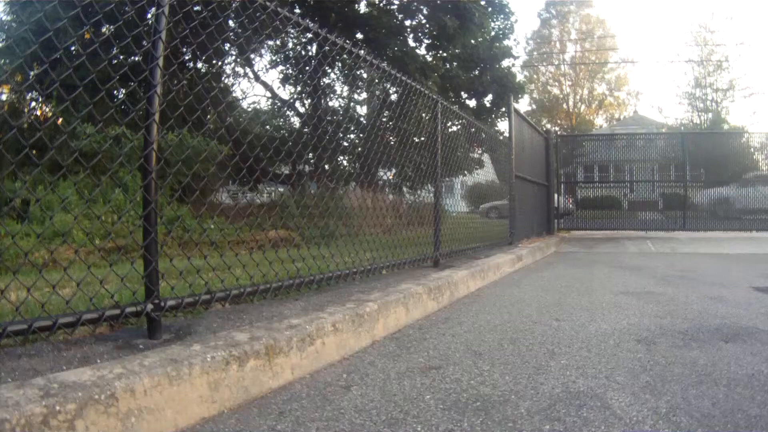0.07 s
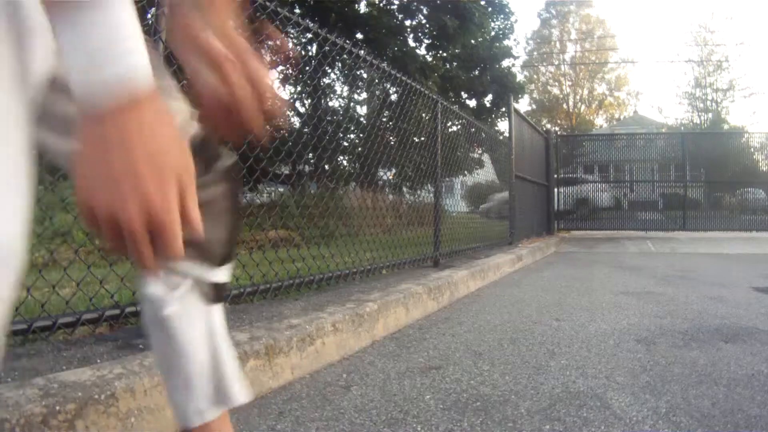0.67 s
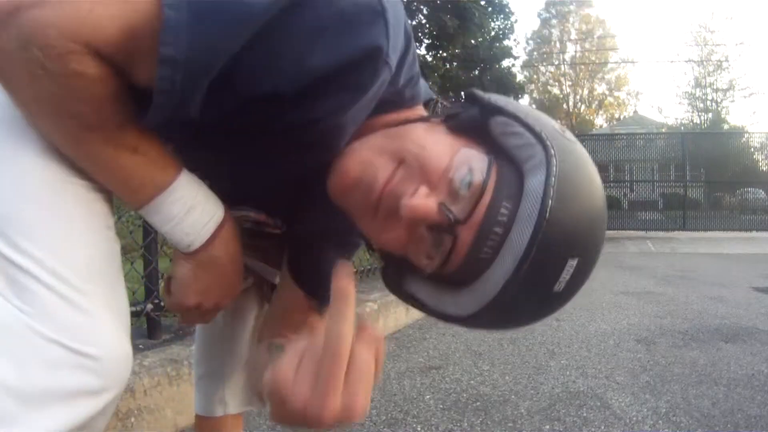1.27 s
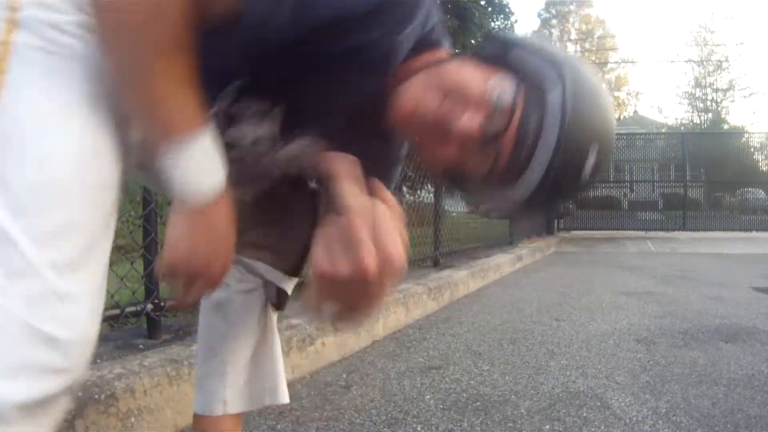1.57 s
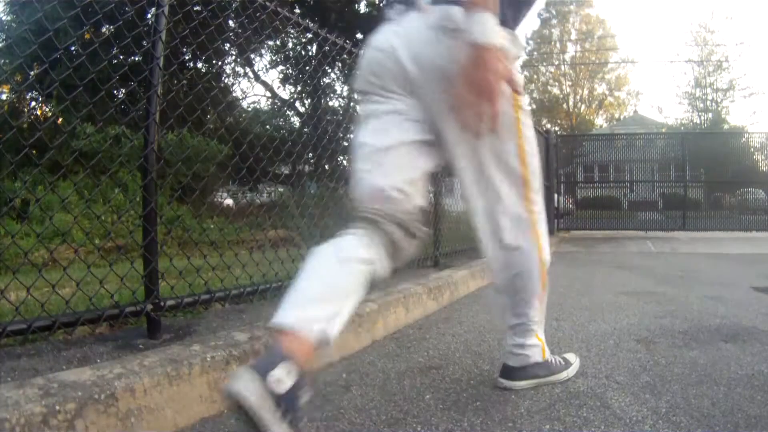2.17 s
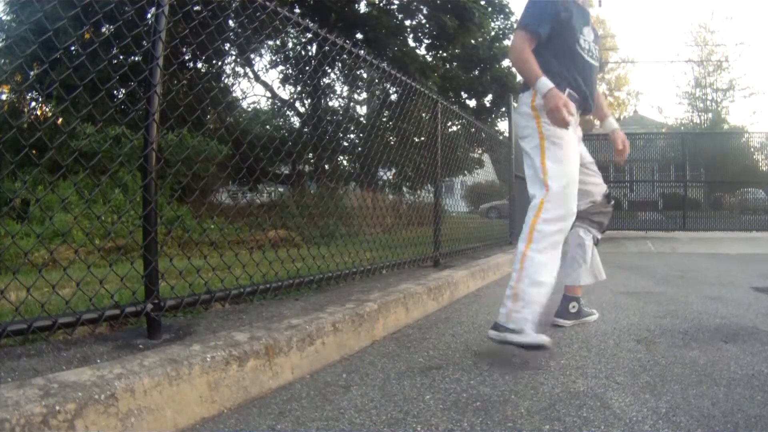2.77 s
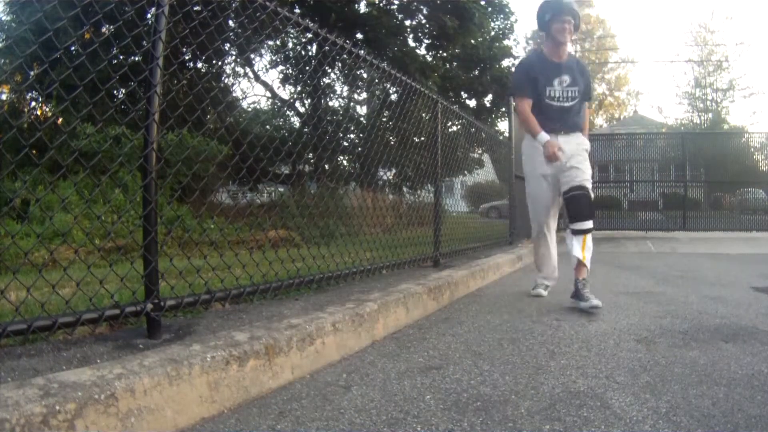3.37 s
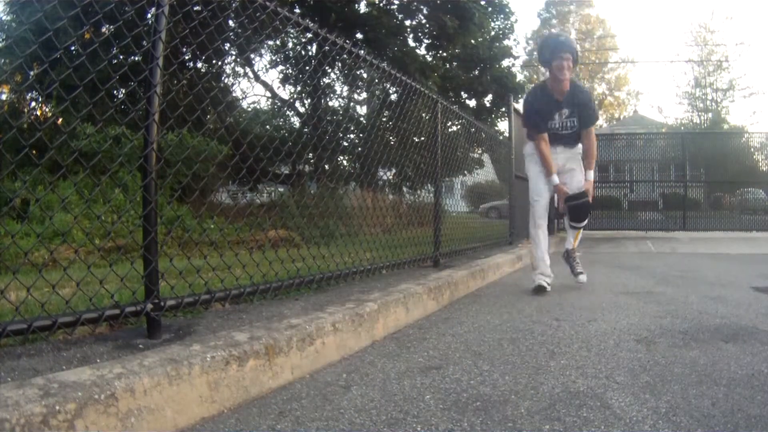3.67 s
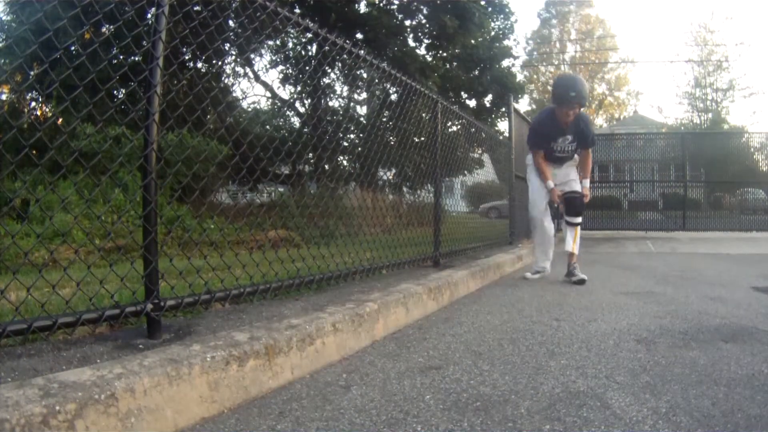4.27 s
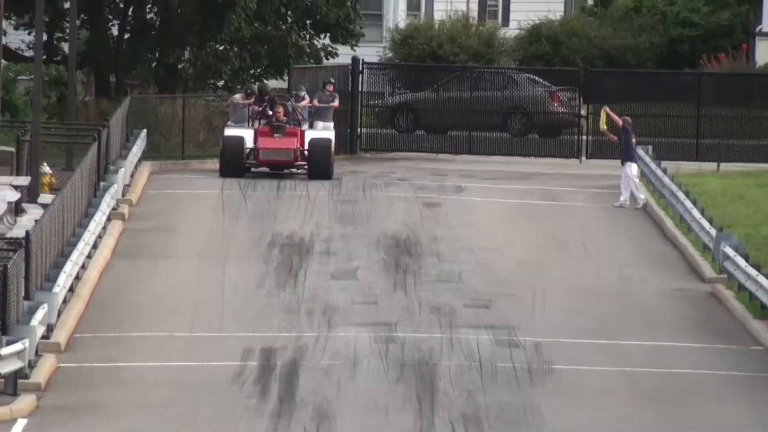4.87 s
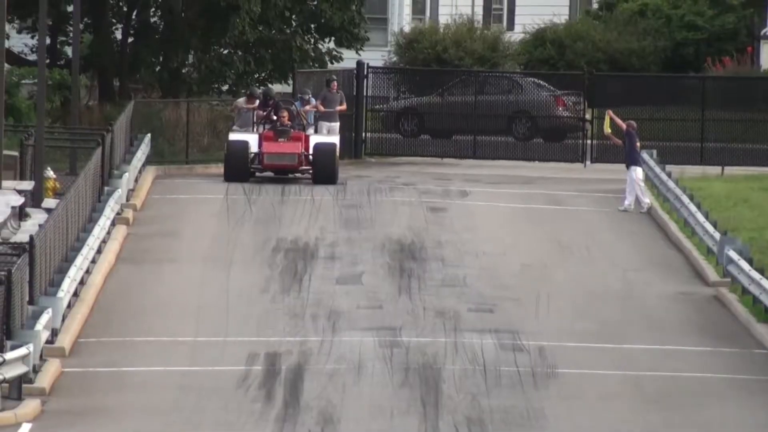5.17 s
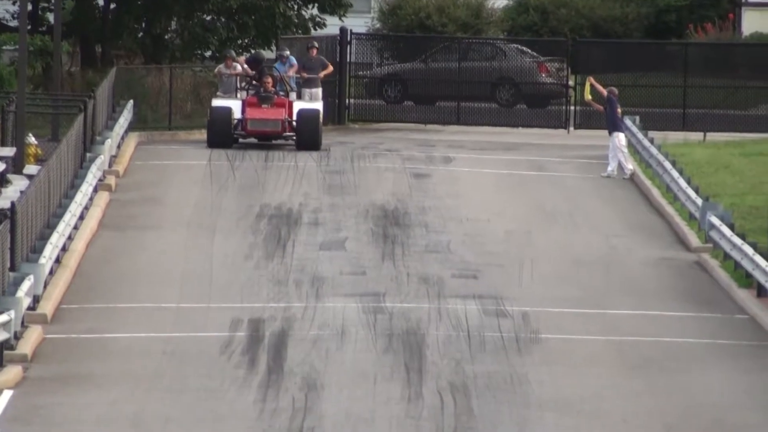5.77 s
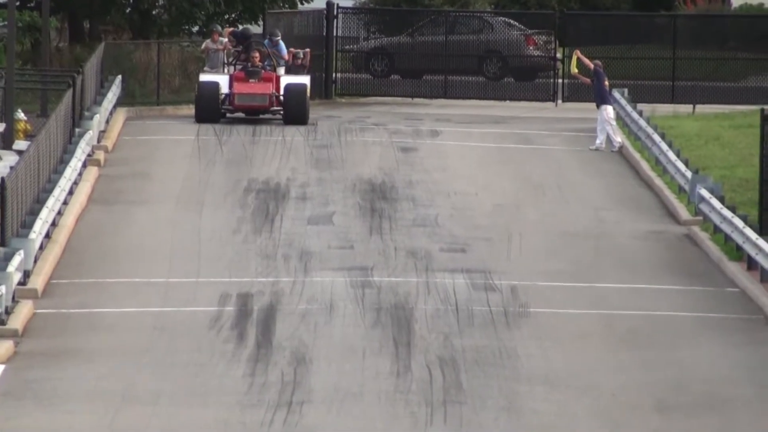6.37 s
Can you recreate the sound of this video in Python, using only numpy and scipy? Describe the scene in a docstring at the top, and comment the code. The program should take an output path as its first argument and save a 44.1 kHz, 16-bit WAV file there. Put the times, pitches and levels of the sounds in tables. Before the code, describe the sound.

A big engine idles close by with a lumpy chug and whine, then a steady exhaust drone and one sharp rev outdoors.

```python
"""Beside a big idling engine, then on an open paved lot. Close by, periodic gas pulses give a lumpy
exhaust, a drive whines at harmonics of its pulley, and valves tick. After a blink of silence, on the
lot, an exhaust drones while an open-piped vehicle off to the right is revved once and runs down:
its firings excite the pipe resonances and its escaping gas rasps. Walls and fences answer faintly
over a low rumble and hiss, and a lone click comes just before the rev."""
import sys
import numpy as np
from scipy import signal
from scipy.fft import rfft, irfft, next_fast_len
from scipy.io import wavfile
from scipy.ndimage import uniform_filter1d, minimum_filter1d, map_coordinates

SR = 44100
rng = np.random.default_rng(int(sys.argv[2]) if len(sys.argv) > 2 else 0)


def dump_mix(stems):
    """Bounce the given channels to the path in sys.argv[1] as a 16-bit WAV at rate SR."""
    frames = np.atleast_2d(stems).T  # one column per channel
    limited = np.clip(frames, -1, 1)  # hard clip at full scale
    pcm = np.round(limited * 32767).astype(np.int16)
    wavfile.write(sys.argv[1], SR, pcm)


N = 287091

# All levels in the tables are relative.
# Harmonics of the idling exhaust: multiple of the cycle rate, level/dB
IDLE_ORDERS = [(5, -34), (6, -40.5), (8, -35), (10, -46), (13, -33.5), (15, -44.5), (16, -45.5)]
# Response of the idling engine's pipe: f/Hz, level/dB
IDLE_PIPE = [(15, -33), (25, -26), (44, -5), (70, 1), (91, 2), (128, -15), (167, -1.5), (186, -3),
             (284, -14), (371, -15.5), (450, -20.5), (580, -61), (990, -120)]
# Pitch of the main whine, the pulley's 15th harmonic: t/s, f/Hz
WHINE_PITCH = [(0.11, 557), (2.4, 555.2), (3.15, 558.9), (4.0, 561.3), (4.9, 555)]
# Harmonics of the drive: multiple of the pulley rate, level/dB
DRIVE_ORDERS = [(10, -9.5), (11, -17), (15, 1.5), (16, -12), (17, -23), (26, -19), (27, -28), (30, -20.5),
                (31, -22), (40, -30), (46, -28), (50, -22.5), (65, -23), (70, -22), (75, -27), (85, -31),
                (95, -34.5), (100, -36), (120, -37), (122, -44)]
# Response of the engine block: f/Hz, level/dB
BLOCK_RESPONSE = [(60, -39), (300, -18), (430, -17), (510, -9), (600, -8.5), (710, -22.5), (970, -15.5),
                  (1400, -32), (1750, -30.5), (2200, -33), (2690, -28.5), (3000, -38.5), (3600, -35.5),
                  (3900, -42.5), (4500, -46), (4700, -47), (6000, -59.5), (7800, -97)]
# Harmonics of the drone: multiple of the cycle rate, level/dB
DRONE_ORDERS = [(6, -19.5), (7, -11), (10, -0.5), (20, -20)]
# Strength of each cylinder of the revved engine, in firing order: level/dB
REV_CYLINDERS = [8.5, -14, -2, 6, -14, 11, 7, 8]
# Low-frequency response of the revved exhaust: f/Hz, level/dB
BOOM_RESPONSE = [(30, -64), (65, -36), (98, -5), (140, -1), (190, 4.5), (235, -1), (285, -7.5),
                 (340, -13.5), (500, -60.5)]
# Resonances of the open pipes: f/Hz, bandwidth/Hz, level/dB
PIPE_MODES = [(430, 43, -9), (528.3, 22, 4), (586.5, 36, -4), (677, 42, -5.5), (844, 40, -8.5),
              (1174, 200, -16), (1448, 200, -15)]
# Spectrum of the escaping gas: f/Hz, level/dB
RASP_SPECTRUM = [(80, -64), (350, 0), (650, -3.5), (850, -4), (1020, -8), (1400, -12), (1750, -12.5),
                 (2700, -12.5), (3400, -15.5), (5100, -18.5), (7200, -30.5), (8600, -48), (15400, -81)]
# Level difference on the lot, left minus right: f/Hz, level/dB
LEFT_LEVEL = [(60, 6), (130, -5), (290, -6.5), (640, -9), (1300, -13), (3000, -9.5), (6800, -13.5),
              (12000, -33)]
# Phase lead of the left channel: f/Hz, phase/rad
LEFT_PHASE = [(40, 0.15), (130, 0.67), (260, 0.86), (1000, 0.8), (3500, 0.4), (6800, 1)]
# Spectrum of the outdoor background: f/Hz, level/dB
AIR_SPECTRUM = [(20, 12), (45, 34), (80, 35.5), (200, 22), (4000, 7), (7000, 9.5), (9000, -1.5),
                (13000, -5.5), (15500, -23)]
# A lone click: t/s, level/dB
CLICK = [(5.4235, -13.5)]

START_S, SWITCH_S = 0.1082, 4.898  # the close idle sounds between these times
CYCLE_HZ, CYCLE_HUNT = 12.65, .013  # idle cycle rate and its fractional wander
DRONE_HZ, DRONE_WANDER = 144, .006  # the drone's 10th order and its fractional wander
OPEN_S, OPENING_S, SHUT_S, SHUTTING_S = 5.565, 0.083, 5.785, 0.039  # throttle moves: start, duration
CLIMB_S, PEAK_S, CLIMB_POWER = 5.55, 5.85, 2.2  # the speed climbs ever faster between these times
REST_HZ, PEAK_HZ, COAST_HZ_PER_S = 135.67, 313.6, 295  # firing rate: at rest, at the top, its fall
OVERRUN_DB, OVERRUN_S = 10.5, 0.083  # extra bark and rasp as the throttle shuts; decay time
ROUGH_REST, ROUGH_SMOOTHING = 0.859, 0.54  # noisy share of the firings; its drop at speed under load
# Exhaust layers: base level/dB, gain at top speed/dB, gain at open throttle/dB
TONE_DB, BOOM_DB = (-32.5, 8, 21), (-26.5, 10, 6.5)
BARK_DB, RASP_DB = (-32.5, 13, 12), (-32.5, 6.5, 6)
SWELL_PEAK_S, SWELL_DB_PER_S, EBB_DB_PER_S = 5.44, 8.5, 2.5  # shared gain of both engines on the lot


def amp(db):
    """Amplitude ratio of a level in decibels."""
    return 10 ** (np.asarray(db) / 20)


def unit(x):
    """Normalisation to an rms of 1."""
    return x / np.sqrt(np.mean(x ** 2) + 1e-20)


def steady(x):
    """Normalisation of the short-term rms to 1."""
    return x / np.sqrt(np.abs(uniform_filter1d(x ** 2, size=SR // 12)) + 1e-12)


def wobble(rate):
    """Smooth random modulation: a spline through `rate` knots a second."""
    knots = rng.standard_normal(int(N * rate / SR) + 4)
    return map_coordinates(knots, [np.arange(N) * rate / SR])


def filtered(x, response):
    """Linear filtering: the spectrum times a complex frequency response."""
    size = next_fast_len(N + SR // 2)
    return irfft(rfft(x, size) * response(np.fft.rfftfreq(size, 1 / SR)), size)[..., :N]


def log_interp(hz, points):
    """Interpolation of a table along a logarithmic frequency axis."""
    f, values = np.transpose(points)
    return np.interp(np.log(hz + 1), np.log(f + 1), values)


def coloured(x, points):
    """Spectral shaping by points of f/Hz, level/dB."""
    return filtered(x, lambda hz: amp(log_interp(hz, points)))


def turns(hz):
    """Phase in revolutions, the time integral of frequency."""
    return np.cumsum(hz) / SR


def orders(angle, table, flutter_db, flutter_hz, drift_rad, spread):
    """Fourier series of a shaft's unsteady tones; at small phase spread they add to one thump a turn."""
    tones = np.zeros(N)
    for order, db in table:
        amplitude = np.sqrt(2) * amp(db + flutter_db * wobble(flutter_hz))
        phase = 2 * np.pi * (round(order) * angle + spread * rng.random())
        tones -= amplitude * np.cos(phase + drift_rad * wobble(flutter_hz))
    return tones


def bursts(angle, decay):
    """Periodic envelope: a jump once a turn, then exponential decay."""
    return unit(np.exp(-decay * (angle % 1)))


def impulses(angle, pattern_db, scatter_db):
    """Impulse train, one a turn, sized by a repeating pattern and by chance."""
    at = np.flatnonzero(np.diff(np.floor(angle)))
    scatter = scatter_db * rng.uniform(-1.3, 1, N)[:len(at)]
    pulses = np.zeros(N)
    pulses[at] = amp(np.resize(pattern_db, len(at)) + scatter)
    return unit(pulses)


def idle_exhaust(cycle):
    """Pulsating flow: harmonics add to one chug a cycle, and eight firings puff noise through the pipe."""
    lope = amp(1.23 * wobble(13))
    chug = orders(cycle, IDLE_ORDERS, flutter_db=1.3, flutter_hz=13, drift_rad=0.25, spread=0.11)
    flow = .5 + bursts(8 * cycle, decay=4.4) + .5 * bursts(cycle, decay=1.3)
    puffs = steady(coloured(flow * rng.standard_normal(N), IDLE_PIPE))
    return lope * (chug + amp(-33.5) * puffs)


def drive_whine(pulley):
    """A rotating drive radiates harmonics of its pulley rate."""
    whine = orders(pulley, DRIVE_ORDERS, flutter_db=1.84, flutter_hz=26, drift_rad=0.11, spread=0.99)
    return amp(-38) * whine


def valve_clatter(pulley, cycle, t60=0.31):
    """Repeated impacts give a comb of overtones; the block filters this rattle and added noise."""
    tooth = 5 * pulley
    ticking = (1 + 0.15 * bursts(pulley, decay=4.6) + 0.28 * bursts(tooth, decay=1.2)
               + 0.11 * bursts(cycle, decay=13))
    noise = rng.standard_normal(N)
    age = np.arange(SR // 20) / SR
    ring = rng.standard_normal(len(age)) * amp(-60 * age / t60)
    rattle = unit(signal.fftconvolve(impulses(pulley, [0], scatter_db=14.5), ring)[:N])
    clatter = unit(coloured(ticking * (noise + .5 * rattle), BLOCK_RESPONSE))
    swell_db = 3.4 * np.exp(-((np.arange(N) / SR - 4.1) / 0.043) ** 2)  # briefly louder at 4.1 s
    return amp(-38.5 + swell_db + 1.1 * wobble(22.04)) * clatter


def idle():
    """Superposition: exhaust, drive and valves follow the phases of the engine cycle and the pulley."""
    cycle = turns(CYCLE_HZ * (1 + CYCLE_HUNT * wobble(4)))
    whine_hz = np.interp(np.arange(N) / SR, *np.transpose(WHINE_PITCH))
    pulley = turns(whine_hz / 15)
    return idle_exhaust(cycle) + drive_whine(pulley) + valve_clatter(pulley, cycle)


def stepped(x, hold_hz=12000):
    """Spectral imaging: coarse time steps mirror a sound about the step rate as a thin treble sizzle."""
    slope = filtered(x, lambda hz: hz * (hz < hold_hz / 2))
    mirror = 2 * slope * np.cos(2 * np.pi * hold_hz * np.arange(N) / SR)
    return x + amp(.5) * filtered(mirror, lambda hz: 1 / np.maximum(hz, hold_hz / 2))


def drone():
    """An exhaust at nearly constant speed radiates a line spectrum, harmonics of its cycle rate."""
    cycle = turns(DRONE_HZ / 10 * (1 + DRONE_WANDER * wobble(14)))
    tones = orders(cycle, DRONE_ORDERS, flutter_db=0.3, flutter_hz=20, drift_rad=0.46, spread=1)
    return amp(-18.5) * tones


def blip():
    """One stab speeds the engine up and friction slows it evenly: throttle, speed, overrun, each 0-1."""
    t = np.arange(N) / SR
    opened = np.clip((t - OPEN_S) / OPENING_S, 0, 1)
    shut = np.clip((t - SHUT_S) / SHUTTING_S, 0, 1)
    climb = np.clip((t - CLIMB_S) / (PEAK_S - CLIMB_S), 0, 1) ** CLIMB_POWER
    coast = np.clip(1 - COAST_HZ_PER_S * (t - PEAK_S) / (PEAK_HZ - REST_HZ), 0, 1)
    overrun = shut * np.exp(-np.maximum(t - SHUT_S - SHUTTING_S, 0) / OVERRUN_S)
    return opened - shut, np.minimum(climb, coast), overrun


def gas_noise(angle):
    """Amplitude-modulated noise: gas tears out with each firing."""
    return unit((1 + bursts(angle, decay=0.75)) * rng.standard_normal(N))


def open_pipes(hz, muffle_hz=4500):
    """Modal response of the pipes: damped resonances of alternating sign, with a treble roll-off."""
    modes = sum((-1) ** k * amp(db) * 1j * hz * width / (centre ** 2 - hz ** 2 + 1j * hz * width)
                for k, (centre, width, db) in enumerate(PIPE_MODES))
    return modes / (1 + (hz / muffle_hz) ** 4)


def revved_engine():
    """Source and filter: firings boom and bark in open pipes and gas rasps, louder with speed and load."""
    throttle, speed, overrun = blip()
    tone_db, boom_db, bark_db, rasp_db = (base + fast * speed + loaded * throttle
                                          for base, fast, loaded in (TONE_DB, BOOM_DB, BARK_DB, RASP_DB))
    # under load the firings even out and the boom gathers into the firing tone
    rough = np.clip(ROUGH_REST - ROUGH_SMOOTHING * speed * throttle, 0, 1)
    firing_hz = REST_HZ + (PEAK_HZ - REST_HZ) * speed
    angle = turns(firing_hz * (1 + 0.02535 * rough * wobble(60)))
    firings = impulses(angle, REV_CYLINDERS, scatter_db=7.5)
    blast = np.sqrt(1 - rough) * firings + np.sqrt(rough) * gas_noise(angle)
    octave = amp(-13.5) * speed * np.sin(4 * np.pi * angle)
    tone = amp(tone_db) * np.sqrt(2) * (np.sin(2 * np.pi * angle) + octave)
    boom = amp(boom_db) * np.sqrt(rough) * steady(coloured(blast, BOOM_RESPONSE))
    bark = amp(bark_db + OVERRUN_DB * overrun) * steady(filtered(blast, open_pipes))
    rasp_gain = amp(rasp_db + OVERRUN_DB * overrun + 1.04 * wobble(45))
    rasp = rasp_gain * unit(coloured(gas_noise(angle), RASP_SPECTRUM))
    return tone + boom + bark + rasp


def from_right(hz):
    """Level and phase differences between two receivers place a source on the right."""
    left = amp(log_interp(hz, LEFT_LEVEL)) * np.exp(1j * log_interp(hz, LEFT_PHASE))
    return np.array([2 * left, np.full_like(left, 2)]) / np.abs(1 + left)


def reflections(x, t60):
    """Diffuse reflection from walls and fences, thin in the bass and different at each ear."""
    t = np.arange(SR // 2) / SR
    tail = rng.standard_normal((2, len(t))) * amp(-60 * t / t60)
    wet = signal.fftconvolve(x, tail / np.linalg.norm(tail[0]), axes=1)[:, :N]
    return coloured(wet, [(200, -19), (550, -14), (1100, -8)])


def outdoor_air():
    """Broadband ambient noise: a faint rumble and hiss."""
    return amp(-43.5) * unit(coloured(rng.standard_normal(N), AIR_SPECTRUM))


def click(decay_s=0.0018):
    """A transient: a sudden step in the signal that dies away quickly, heard as a brief tick."""
    t = np.arange(N) / SR
    return sum(amp(db) * (t >= at) * np.exp(-np.abs(t - at) / decay_s) for at, db in CLICK)


def gain_control(x, threshold_db, slope, window_s):
    """Compression: the gain falls by a share of each dB that the recent level lies over the threshold."""
    memory = np.exp(-1 / (window_s * SR))
    power = signal.lfilter([1 - memory], [1, -memory], np.mean(x ** 2, axis=0))
    level_db = 10 * np.log10(power + 1e-12)
    return x * amp(-slope * np.maximum(level_db - threshold_db, 0))


def limiter(x, ceiling=.975):
    """Peak limiting: the gain ducks for a few milliseconds around any peak above the ceiling."""
    needed = ceiling / np.maximum(np.abs(x).max(axis=0), ceiling)
    return x * uniform_filter1d(minimum_filter1d(needed, size=SR // 150), size=SR // 200)


def scene():
    """Two sound fields in turn: the close, centred idle, then direct and reflected sound on the lot."""
    t = np.arange(N) / SR
    close = np.clip(np.minimum(t - START_S, SWITCH_S - t) / 0.0022, 0, 1)
    outside = np.clip((t - SWITCH_S) / 0.013, 0, 1) ** 2
    swell_db = np.minimum(SWELL_DB_PER_S * (t - SWELL_PEAK_S), EBB_DB_PER_S * (SWELL_PEAK_S - t))
    engines = filtered(amp(swell_db) * (drone() + revved_engine()), from_right)
    air = outdoor_air()
    return close * stepped(idle()) + outside * (engines + reflections(engines, t60=0.38) + air + click())


def record(dry):
    """Compression and limiting hold the rev down; a low-pass filter ends the band at 15.6 kHz."""
    held = gain_control(dry, threshold_db=-15.0, slope=0.43, window_s=0.032)
    return filtered(limiter(held), lambda hz: hz < 15600)


dry = scene()
out = record(dry)
dump_mix(out)
```